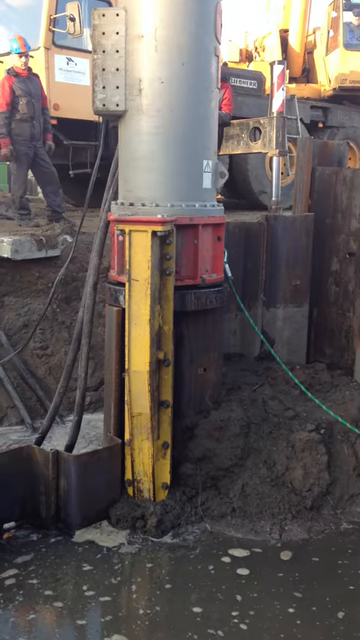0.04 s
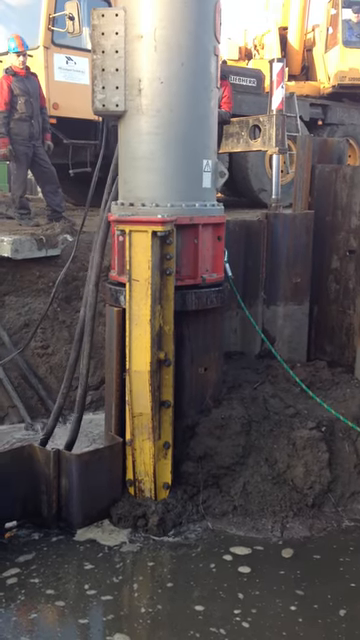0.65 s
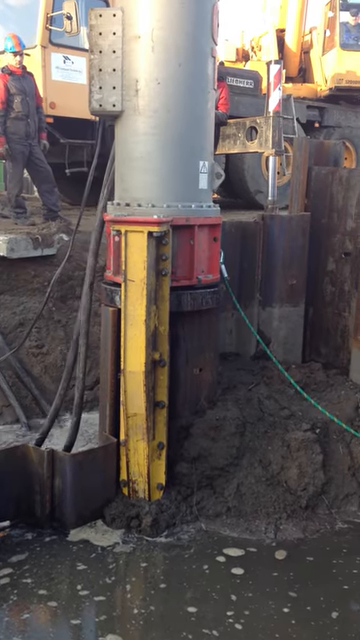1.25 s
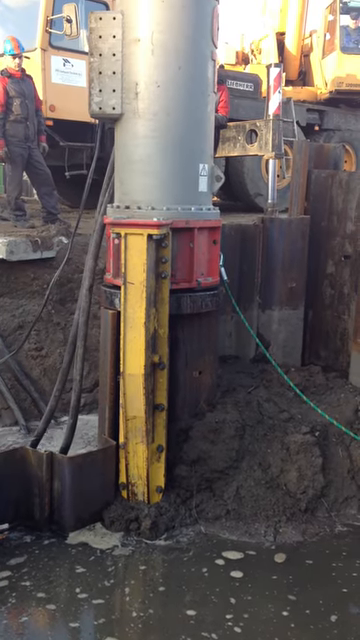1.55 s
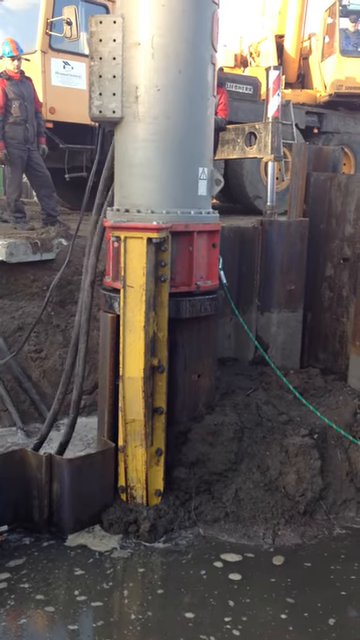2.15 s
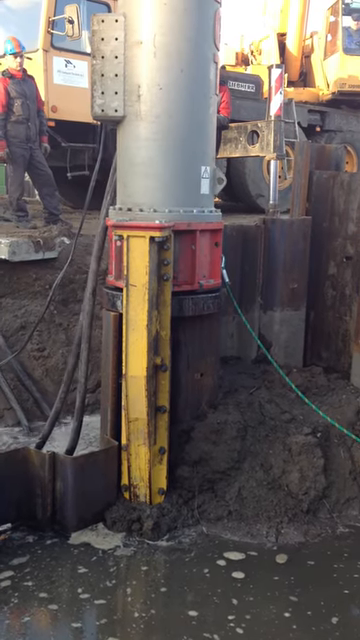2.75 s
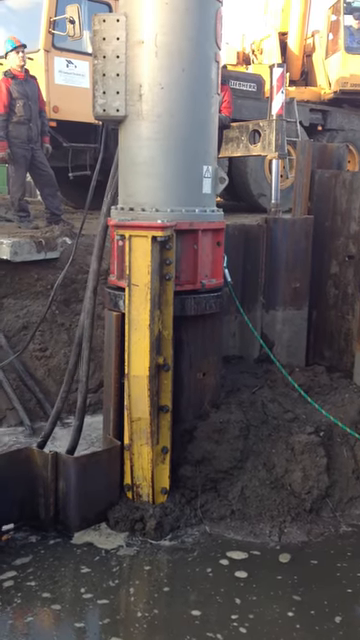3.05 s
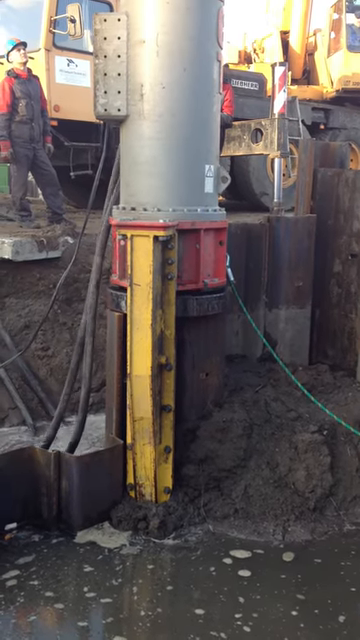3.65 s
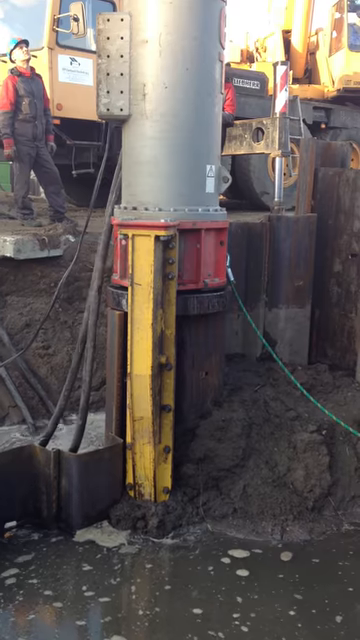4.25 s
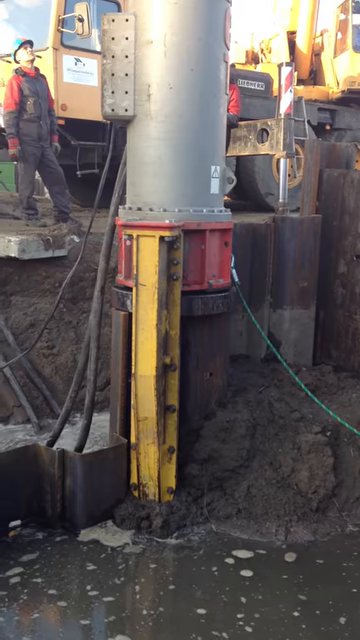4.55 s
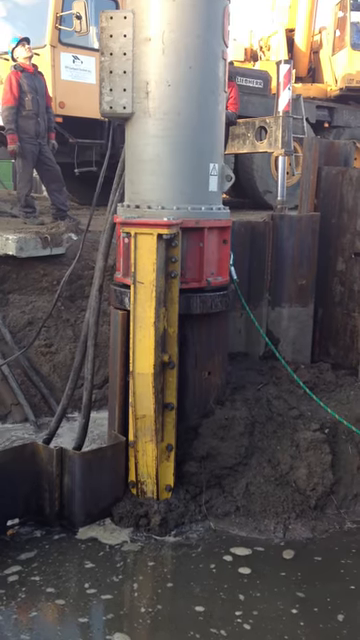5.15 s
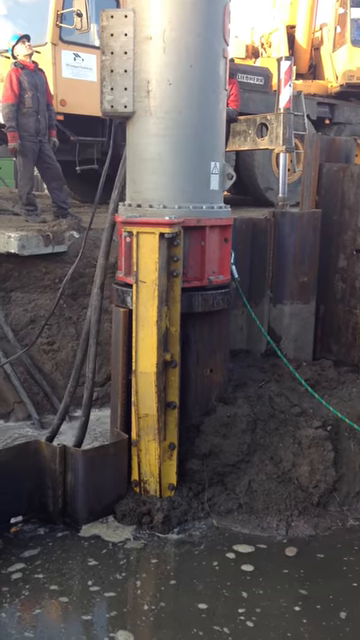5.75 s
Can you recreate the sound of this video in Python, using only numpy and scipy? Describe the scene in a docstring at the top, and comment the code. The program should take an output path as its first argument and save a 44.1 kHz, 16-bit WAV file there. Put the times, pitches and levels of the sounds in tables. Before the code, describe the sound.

Four evenly spaced pile driver blows, each a rising rush ending in a metallic boom and rebound clank, while machinery hums.

```python
"""A rising rush over the drone of a power pack ends in a boom: a hydraulic hammer drives a steel pile.
Every 1.6 s oil hisses as the ram is lifted, a valve clacks at the top, and the ram falls with a moan.
The impact excites the modes of pile and casing, which decay freely. The hammer rebounds, lands with
a bright clank, settles with a knock and shudders."""
import sys
import numpy as np
from scipy import signal
from scipy.fft import rfft, irfft
from scipy.io import wavfile
from scipy.ndimage import uniform_filter1d, minimum_filter1d

SR = 44100
rng = np.random.default_rng(int(sys.argv[2]) if len(sys.argv) > 2 else 0)


def log_audio(samples):
    """Write samples as a 16-bit WAV file to the path given in sys.argv[1]."""
    # one column per channel
    frames = np.atleast_2d(samples).T
    # limit to full scale, then quantise
    limited = np.clip(frames, -1, 1)
    pcm = np.round(limited * 32767).astype(np.int16)
    wavfile.write(sys.argv[1], SR, pcm)


N = 264600
T = np.arange(N) / SR


def gain_of(db):
    """Amplitude ratio of a level in decibels."""
    return 10 ** (np.asarray(db) / 20)


def unit_rms(x):
    """Normalisation to rms 1."""
    return x / np.sqrt(np.mean(x ** 2) + 1e-20)


def add(mix, start_s, sound):
    """Superposition: a sound joins the mix from start_s."""
    at = round(start_s * SR)
    sound = sound[max(-at, 0):]
    part = mix[max(at, 0):][:len(sound)]
    part += sound[:len(part)]


def curve_at(points, hz):
    """Interpolation of (frequency_hz, value) points on a log-frequency axis."""
    points_hz, values = np.transpose(points)
    return np.interp(np.log(hz + 1), np.log(points_hz + 1), values)


def noise(spectrum, size=N):
    """Spectral shaping: white noise takes on a relative spectral density, at rms 1."""
    hz = np.fft.rfftfreq(size, 1 / SR)
    return unit_rms(irfft(rfft(rng.standard_normal(size)) * gain_of(curve_at(spectrum, hz)), size))


def band(centre_hz, width_hz):
    """Resonance: narrow-band noise of rms 1; centred on 0 Hz it is a slow random fluctuation."""
    hz = np.fft.rfftfreq(N, 1 / SR)
    return unit_rms(irfft(rfft(rng.standard_normal(N)) / (1 + ((hz - centre_hz) / width_hz) ** 2), N))


def burst(rows, rise_s):
    """Modal overlap: countless struck modes merge into noise whose bands decay at their own rates."""
    centres_hz, density_db, t60_s = np.transpose(rows)
    t, hz = T[:2 * SR], np.fft.rfftfreq(2 * SR, 1 / SR)
    spectrum = rfft(noise(np.c_[centres_hz, density_db], size=len(t)))
    bands = (irfft(spectrum * curve_at(np.c_[centres_hz, share], hz)) for share in np.eye(len(rows)))
    decaying = sum(part * np.exp(-np.log(1000) * t / t60) for part, t60 in zip(bands, t60_s))
    return decaying * (1 - np.exp(-t / rise_s))


def ring(modes, scatter=0.):
    """Damped modes: far from the struck end they alternate in sign, so the sum swells, then fades."""
    t = T[:2 * SR]
    detune = 1 + scatter * rng.standard_normal(len(modes))
    return sum((-1) ** k * gain_of(db) * np.exp(-np.log(1000) * t / t60)
               * np.sin(2 * np.pi * hz * detune[k] * t) for k, (hz, db, t60) in enumerate(modes))


def swell(times, rise_db_per_s, fade_db_per_s, hold_s=0, sag_db_per_s=0):
    """Exponential growth and decay: a gain climbs to 1 at each time, holds or sags, then fades."""
    t = T - np.reshape(times, (-1, 1))
    down_db = (rise_db_per_s * np.maximum(-t, 0) + sag_db_per_s * np.clip(t, 0, hold_s)
               + fade_db_per_s * np.maximum(t - hold_s, 0))
    return gain_of(-down_db.min(axis=0))


def stroke_times():
    """Periodic extension: the times of the blows, with one more before and after at the same pace."""
    starts_s = [row[0] for row in BLOWS]
    period_s = np.mean(np.diff(starts_s))
    return np.array([starts_s[0] - period_s, *starts_s, starts_s[-1] + period_s])


# Engine and pump tones (levels in all tables are relative): pitch_hz, level_db
ENGINE_TONES = [(134.6, -57), (263.8, -52.5), (301.5, -58), (355.3, -56), (387.6, -58.5), (527.6, -59),
                (602.9, -54.5), (721.4, -62.5), (963.6, -63.5), (1200, -66.5)]
# Roar of engine and fan: frequency_hz, density_db
ENGINE_ROAR = [(18, -72), (30, -46), (43, -35), (119, -5.5), (205, -7), (260, -7.5), (328, -12.5),
               (374, -4), (415, -9.5), (538, -9.5), (774, -14.5), (1440, -19.5), (5440, -35.5),
               (6040, -41.5), (15000, -46)]

def power_pack(tones_db=-2.5, roar_db=-46, hum_db=-67, whistle_db=-65, waver=0.0038, flutter_db=3):
    """Rotating machinery radiates tones in broadband noise; these, a hum and an oil whistle follow load."""
    # The pump's load builds up through the lift and is shed after the blow.
    load = swell(stroke_times() - 0.29, rise_db_per_s=48, fade_db_per_s=60, hold_s=0.62)
    wavering_s = np.cumsum(1 + waver * band(0, 2.87)) / SR
    tones = sum(gain_of(db + flutter_db * band(0, 6.2)) * np.sqrt(2)
                * np.sin(2 * np.pi * (hz * wavering_s + rng.random())) for hz, db in ENGINE_TONES)
    engine = gain_of(2.4 * load) * (gain_of(tones_db) * tones + gain_of(roar_db) * noise(ENGINE_ROAR))
    hum = gain_of(hum_db + 8 * load) * band(centre_hz=55.7, width_hz=10)
    whistle = gain_of(whistle_db + 3 * load) * band(centre_hz=6010, width_hz=410)
    return engine + hum + whistle


# Oil rushing on the lift, in the fall and as a shrill jet: frequency_hz, density_db
LIFT_HISS = [(300, -15), (1200, 4.5), (2500, -1), (4500, -3), (7800, -1), (10000, -10.5), (12500, -6.5),
             (15500, -14)]
FALL_HISS = [(80, 7.5), (250, 5.5), (700, 10.5), (1300, 6.5), (2200, 1.5), (4000, -3.5), (7800, -4),
             (10000, -15), (12500, -11.5), (15500, -24)]
JET_HISS = [(2000, -30), (5000, -10), (7800, 5), (10000, -3), (12500, 4.5), (15500, -4)]

def oil_flow(lift_db=-48.5, fall_db=-24.5, jet_db=-34, spurt_db=-45.5, churn_db=0.57, churn_hz=60,
             shutoff_lead_s=0.41, hold_s=0.16):
    """Flow noise follows the speed of the ram: gentle on the lift, a swelling rush in the fall."""
    strokes = stroke_times()
    full_flow_s = strokes - shutoff_lead_s - hold_s
    lift = gain_of(lift_db) * swell(full_flow_s, rise_db_per_s=50.5, fade_db_per_s=170, hold_s=hold_s)
    fall = gain_of(fall_db) * swell(strokes, rise_db_per_s=129.5, fade_db_per_s=85.5)
    # At top speed the jet through the valve turns shrill; it spurts again just after the blow.
    jet = gain_of(jet_db) * swell(strokes, rise_db_per_s=137, fade_db_per_s=480)
    spurt = gain_of(spurt_db) * swell(strokes + 0.11, rise_db_per_s=450, fade_db_per_s=450)
    hiss = lift * noise(LIFT_HISS) + fall * noise(FALL_HISS) + (jet + spurt) * noise(JET_HISS)
    starts_s, *_, flow_db = np.transpose(BLOWS)
    return hiss * gain_of(np.interp(T, starts_s - .5, flow_db) + churn_db * band(0, churn_hz))


def guide_friction(level_db=-29.5, base_hz=560, climb_hz=566.5, climb_s=.052, width_hz=45):
    """Sliding friction: the ram rubs in its guide, a hoarse moan climbing ever faster up to the blow."""
    out = np.zeros(N)
    for blow_s, *_ in BLOWS:
        pitch_hz = base_hz + climb_hz * np.exp(np.minimum(T - blow_s, 0) / climb_s)
        tone = np.sqrt(2) * np.sin(2 * np.pi * np.cumsum(pitch_hz) / SR)
        out += swell(blow_s, rise_db_per_s=116, fade_db_per_s=3000) * tone
    return gain_of(level_db) * out * band(0, width_hz)


# Valve switching at the top of the lift: start_s, level_db
VALVE_SWITCHES = [(-0.105, -23), (1.495, -23.5), (3.101, -22), (4.715, -23.5)]
# Tick of the spool and slam of the oil: frequency_hz, density_db, t60_s
VALVE_TICK = [(61.4, -25, .2), (110, -11, 0.36), (159, 14.5, 0.6), (346, -4, 0.35), (580, 6.5, 0.54),
              (1200, -7, 0.82), (2000, -8, 0.31), (2780, -4, .2), (4600, -19, 0.23), (8150, -12.5, 0.26),
              (10000, -24, 0.14), (15000, -27, .15)]
VALVE_SLAM = [(70, -15, 0.22), (233, 8, 0.23), (400, -5.5, 0.25), (560, -3.5, 0.38), (1030, 4.5, 0.4),
              (1600, -6, 0.63), (2350, -16.5, 0.61), (4000, -20.5, 0.41), (8000, -25, 0.16),
              (10000, -24, 0.16), (15000, -22, .15)]
# Modes of the oil lines and valve block: pitch_hz, level_db, t60_s
LINE_MODES = [(236, -5.5, 0.32), (501, 0, 0.23), (653, 2, 0.2), (680, -10.5, 0.85), (873, -2.5, 0.7),
              (1000, -11, 0.84), (1070, -9, 0.51), (1150, -7.5, 0.44), (1540, -12, 0.79), (1706, -15, .55),
              (1850, -12.5, 0.55), (2440, -12, 0.31), (2340, -8, 0.2), (3600, -26, 0.21)]

def valve(tick_db=-6, slam_db=-3, lines_db=-7, slam_delay_s=.030):
    """Hydraulic shock: the spool ticks over, then the stopped oil slams the lines and sets them ringing."""
    out = np.zeros(N)
    for start_s, db in VALVE_SWITCHES:
        add(out, start_s, gain_of(db + tick_db) * burst(VALVE_TICK, rise_s=0.0023))
        add(out, start_s + slam_delay_s, gain_of(db + slam_db) * burst(VALVE_SLAM, rise_s=0.0059))
        add(out, start_s + slam_delay_s, gain_of(db + lines_db) * ring(LINE_MODES, scatter=0.00627))
    return out


# The rig shaking after a blow: frequency_hz, density_db
SHUDDER_SPECTRUM = [(30, -55), (80, -37), (130, -5.5), (175, 3), (300, -4.5), (420, -6), (620, -6.5),
                    (850, -10.5), (1450, -15.5), (2300, -21.5), (3500, -31), (8000, -55), (15000, -72)]

def shudder(level_db=-21.5, delay_s=0.048, rattle_db=1.5, rattle_hz=35):
    """Random amplitude modulation: casing, hoses and sheet piles shake while the hammer bounces."""
    envelope = np.zeros(N)
    for blow_s, *_, shudder_db, _ in BLOWS:
        shake = swell(blow_s + delay_s, rise_db_per_s=900, fade_db_per_s=103,
                      hold_s=0.25, sag_db_per_s=19.5)
        envelope += gain_of(level_db + shudder_db) * shake
    return envelope * unit_rms(noise(SHUDDER_SPECTRUM) * gain_of(rattle_db * band(0, rattle_hz)))


# Hammer landing after its rebound: start_s, level_db, frame_db, snap_db, snap_delay_s
LANDINGS = [(0.548, -17, -23.5, -17, 0.0036), (2.145, -17, -22.5, -12.5, 0.0025),
            (3.75, -22, -19.5, -9, .006), (5.360, -15.5, -19.5, -11, .006)]
# Hammer settling on the pile: start_s, level_db, helmet_db
SETTLINGS = [(0.648, -24.5, -40), (2.237, -19, -18), (3.845, -21.5, -27.5), (5.448, -19, -24.5)]
# Dense vibration of the landing, the hard steel snap and the settling: frequency_hz, density_db, t60_s
CLANK_BANDS = [(25, -29, .15), (80, -46, .2), (153, -5, 0.85), (380, -20, 0.93), (695, -7.5, 0.18),
               (1100, -4.5, 0.2), (1380, -6, 0.24), (2270, -13, 0.22), (3960, -22.5, 0.29),
               (8140, -23.5, 0.33), (9500, -31.5, 0.29), (15000, -33, 0.23)]
SNAP_BANDS = [(300, -14, 0.033), (695, 10.5, 0.037), (1480, 11, 0.036), (2220, 8, 0.031),
              (3530, -9.5, 0.078), (7400, -9.5, 0.048), (9650, -17, 0.029), (13000, -10, 0.023),
              (15500, -30, 0.023)]
KNOCK_BANDS = [(40, -43, .3), (90, -4.5, .4), (151, 4, 0.57), (350, 2, 0.46), (600, -1, 0.71),
               (930, 0, 0.31), (1490, -4, 0.2), (3000, -21, 0.13), (7000, -38, 0.22), (15000, -69, .2)]
# Modes of the hammer frame and of the helmet on the pile head: pitch_hz, level_db, t60_s
FRAME_MODES = [(134.9, -5.5, 0.63), (164.8, -0.5, 0.66), (515, -10, 0.99), (609, 5, 0.097), (694, 7, 0.071),
               (729, 5.5, 0.082), (759, 1, 0.19), (1167, -17, 0.13), (1405, -1, 0.22), (1480, -3, 0.3),
               (1500, 2.5, 0.15), (1760, -9, 0.24), (2160, -13, 0.12), (2850, -29, 0.059),
               (3490, -21, 0.16), (4370, -15, 0.2), (5660, -22, 0.25), (6700, -16.5, 0.14)]
HELMET_MODES = [(178, -12, 0.32), (499, 4, 0.22), (516.5, 4.5, 0.26), (564, -1, 0.23), (620, 0, 0.25),
                (725, -4.5, 0.18)]

def rebounds():
    """Elastic rebound: the hammer touches down, snaps home, and knocks once more as it settles."""
    out = np.zeros(N)
    for start_s, db, frame_db, snap_db, snap_delay_s in LANDINGS:
        add(out, start_s, gain_of(db) * burst(CLANK_BANDS, rise_s=0.00087))
        add(out, start_s, gain_of(frame_db) * ring(FRAME_MODES, scatter=0.0044))
        add(out, start_s + snap_delay_s, gain_of(snap_db) * burst(SNAP_BANDS, rise_s=0.00087))
    for start_s, db, helmet_db in SETTLINGS:
        add(out, start_s, gain_of(db) * burst(KNOCK_BANDS, rise_s=0.00057))
        add(out, start_s, gain_of(helmet_db) * ring(HELMET_MODES, scatter=0.0039))
    return out


# Ram on pile: start_s, force_db, ring_db, drone_db, shudder_db, flow_db
BLOWS = [(0.373, -1, 0.5, -33.5, -0.5, 1.5), (1.971, 2, 1.5, -29, 1, 0.5),
         (3.577, 0.5, -1.5, -25.5, -1.5, 2), (5.188, -0.5, -2.5, -34, 0.5, 0.5)]
# Steel faces meeting, and the dense vibration of the blow: frequency_hz, density_db, t60_s
STRIKE_BANDS = [(150.2, -15, 0.021), (700, -1, 0.01), (1340, 5.5, 0.013), (1950, -10, 0.02),
                (3220, -8.5, 0.012), (6000, -12.5, 0.008), (15000, -43, 0.0074)]
CRACK_BANDS = [(25, -49, .15), (70, -40, .15), (150, -23, .12), (470, 11, 0.17), (1010, -2.5, 0.39),
               (2000, -7, 0.087), (3440, -19, 0.38), (8300, -22.5, 0.55), (10000, -24, 0.15),
               (15000, -26, 0.091)]
# Modes of the struck steel: pitch_hz, level_db, t60_s
HEAVE_MODE = [(390, 0.5, 0.019)]  # first heave of the casing
BOOM_MODES = [(109, -35, 0.16), (135, -13.5, 0.2), (159.7, -7, 0.27), (200, 7, 0.086), (237.8, -0.5, 0.24),
              (278, 3.5, 0.22), (303.7, 0, 0.16), (335.2, -0.5, 0.12), (405, -7, 0.14), (452, -0.5, 0.12),
              (525, -14.5, 0.34), (555, -12.5, 0.26), (631, -0.5, 0.15), (675, -0.5, 0.16),
              (737, 2.5, 0.035), (835, -17.5, 0.37), (853, -5.5, 0.098), (948, -1.5, 0.077),
              (1083, -27, 0.22), (1175, -20, 0.18), (1414, -20, 0.22), (1890, -24, 0.39), (2475, -24, 0.46)]  # short, strong modes of pile and casing
LONG_MODES = [(233, -2, 2), (252, 7, 0.14), (306.7, -3, 1.86), (359.7, -5.5, 1.93), (513, -9.5, 3),
              (534, -3.5, 1.7), (640, -14, .7), (952, -24, 0.56), (1195, -23, 0.93), (1467, -5, 0.95)]  # long ring of the steel
SHEEN_MODES = [(3470, -1, 0.56), (4550, -2, .55), (5515, -3.5, 0.92), (5560, -11, 0.56), (5500, -9, 0.63),
               (5730, -3.5, 0.73), (5640, -5, 0.42)]  # thin, high ring of the casing
DRONE_MODE = [(261.3, -3.5, 3.04)]  # the pile's slowest-dying mode

def blows(boom_db=-10, heave_db=-4, crack_db=-16, strike_db=-2, long_db=-27, sheen_db=-39.5,
          strike_delay_s=.0018, echo_db=-13, echo_delay_s=0.032,
          chatter_db=-8, chatter_gap_s=0.0051, chatter_fade_db_per_s=80):
    """Impulse response: the ram meets the same steel each time, so every blow excites the same modes."""
    strike = gain_of(strike_db) * burst(STRIKE_BANDS, rise_s=0.00023)
    shock = gain_of(heave_db) * ring(HEAVE_MODE) + gain_of(crack_db) * burst(CRACK_BANDS, rise_s=0.0014)
    add(shock, strike_delay_s, strike)
    blow = shock + gain_of(boom_db) * ring(BOOM_MODES)
    add(blow, echo_delay_s, gain_of(echo_db) * shock)  # reflection from the sheet-pile wall
    # Stress waves make the joint chatter.
    for delay_s in np.cumsum(chatter_gap_s * rng.uniform(.6, 1.2, size=6)):
        add(blow, delay_s, gain_of(chatter_db - chatter_fade_db_per_s * delay_s) * strike)
    tail = gain_of(long_db) * ring(LONG_MODES) + gain_of(sheen_db) * ring(SHEEN_MODES)
    drone = ring(DRONE_MODE)
    out = np.zeros(N)
    for start_s, force_db, ring_db, drone_db, *_ in BLOWS:
        add(out, start_s, gain_of(force_db) * blow + gain_of(ring_db) * tail + gain_of(drone_db) * drone)
    return out


def scene():
    """Superposition: the hammer's sounds, with deep bass cut below 100 Hz, over the power pack's drone."""
    hammer = blows() + rebounds() + shudder() + valve() + oil_flow() + guide_friction()
    high_passed = signal.sosfilt(signal.butter(4, 100, "high", fs=SR, output="sos"), hammer)
    return (high_passed + power_pack())[None]


def record(dry, ceiling=.72, release_db_per_s=1100, bass_cut_hz=56, treble_cut_hz=15450):
    """Peak limiting squashes the blows; band limiting then removes deep bass and the highest treble."""
    over_db = 20 * np.log10(np.maximum(abs(dry[0]) / ceiling, 1))
    release_db = T * release_db_per_s
    held_db = np.maximum.accumulate(over_db + release_db) - release_db  # lets go within milliseconds
    limited = dry * gain_of(uniform_filter1d(minimum_filter1d(-held_db, size=25), size=25))
    lean = signal.sosfiltfilt(signal.butter(2, bass_cut_hz, "high", fs=SR, output="sos"), limited)
    low_pass = signal.firwin(511, treble_cut_hz, window=("kaiser", 9), fs=SR)
    return signal.oaconvolve(lean, low_pass[None], "same")


dry = scene()
out = record(dry)
log_audio(out)
```